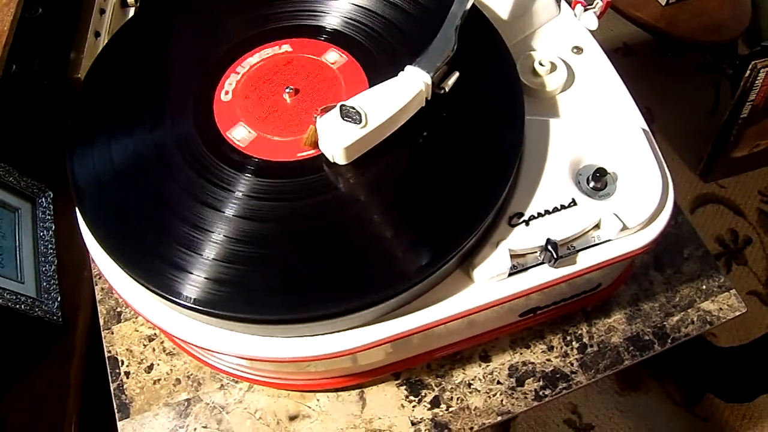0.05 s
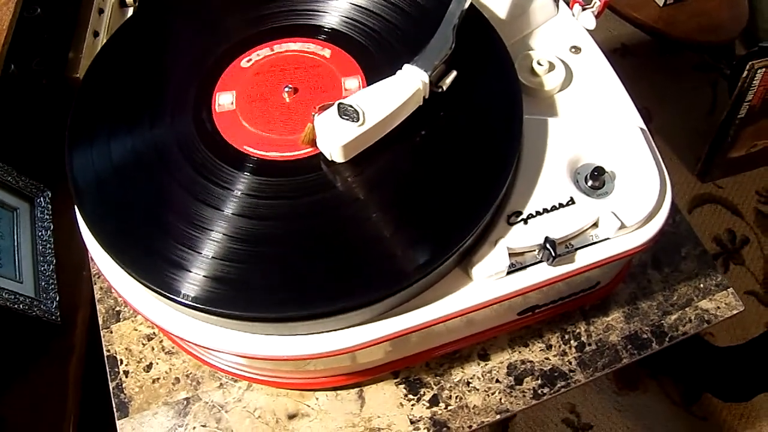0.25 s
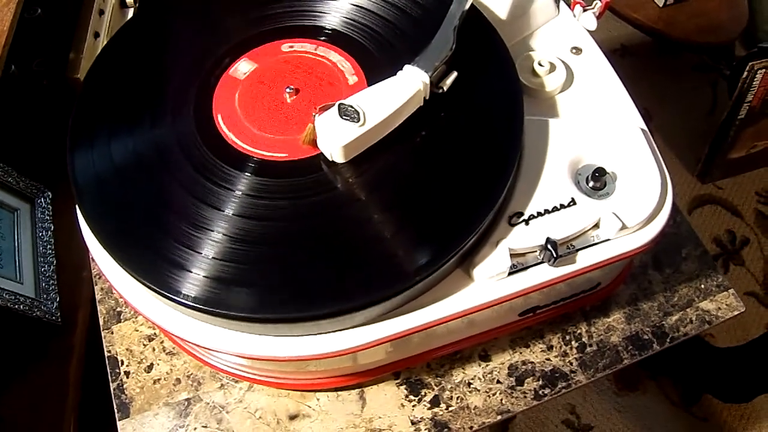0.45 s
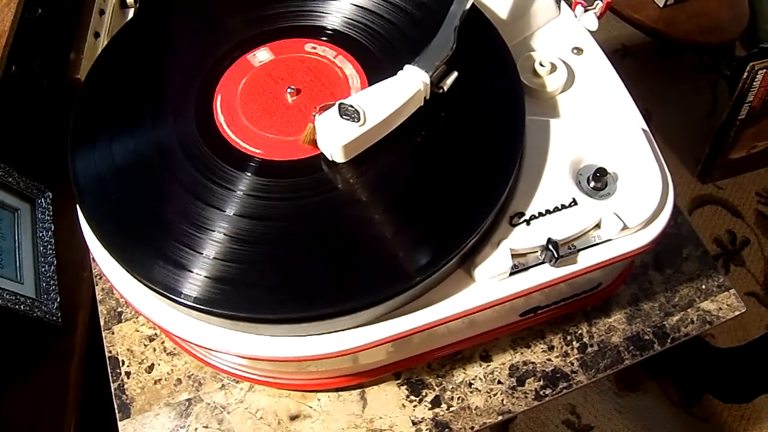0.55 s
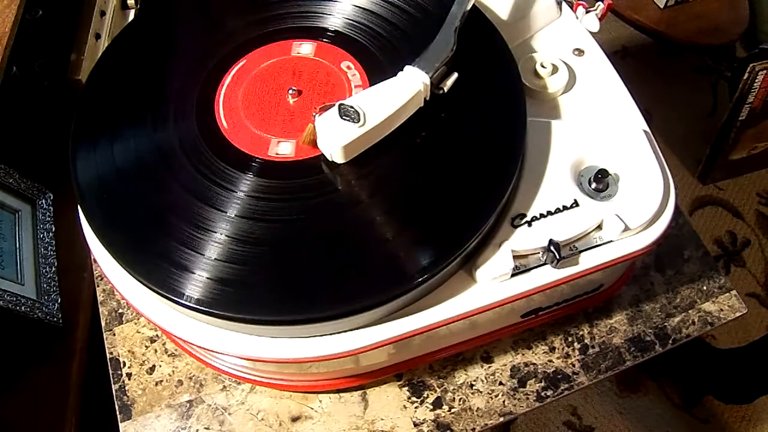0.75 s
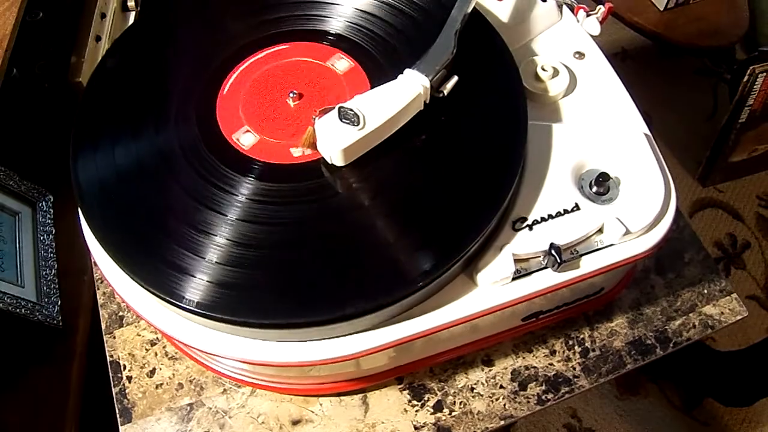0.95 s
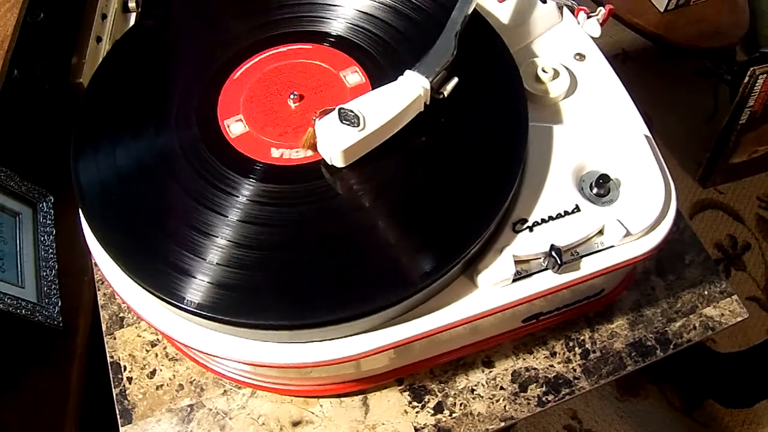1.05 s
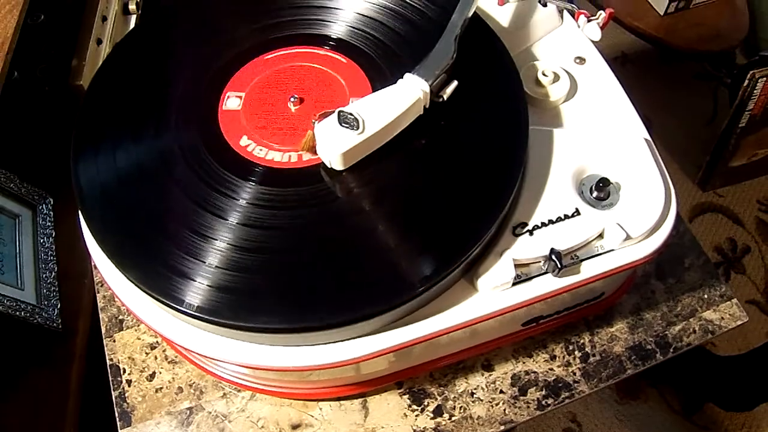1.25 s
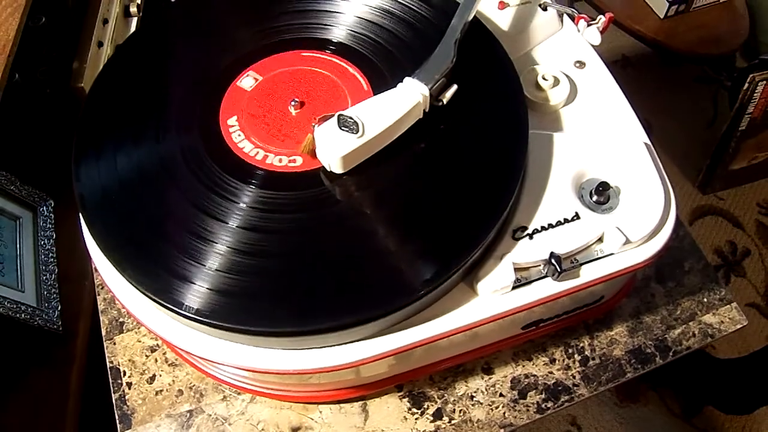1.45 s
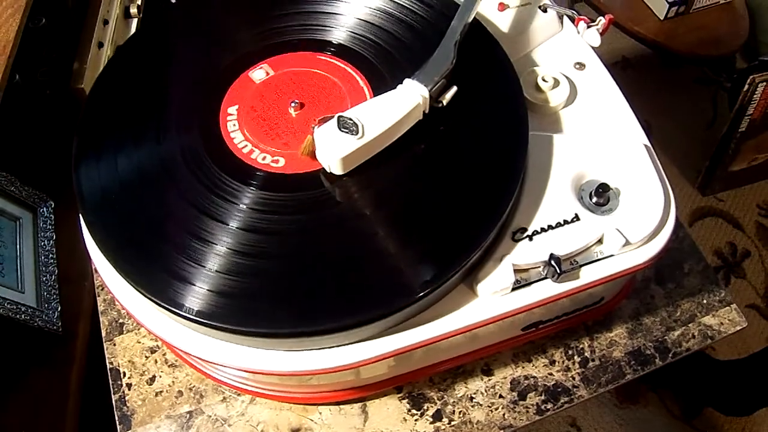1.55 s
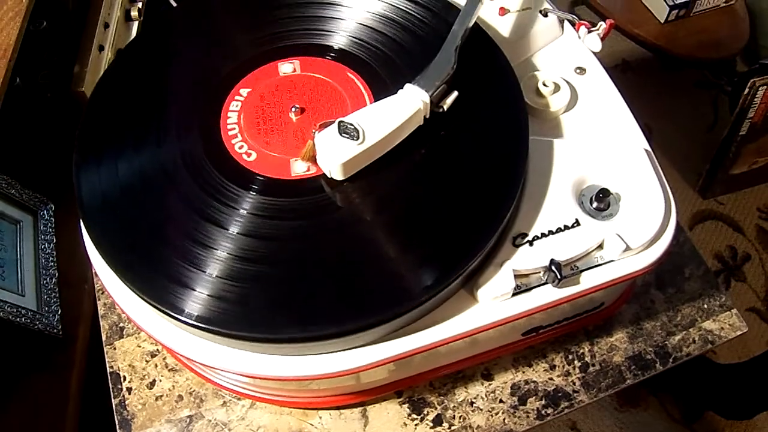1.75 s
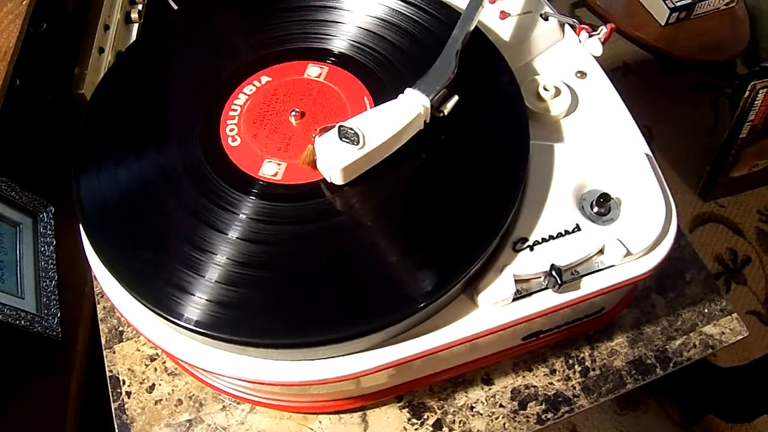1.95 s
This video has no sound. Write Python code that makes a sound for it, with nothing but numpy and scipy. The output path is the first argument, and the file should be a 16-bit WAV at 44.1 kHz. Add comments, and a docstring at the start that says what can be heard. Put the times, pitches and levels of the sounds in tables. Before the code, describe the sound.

A record player pops and clacks at a record's end over hiss and motor rumble.

```python
"""A soft rumble and hiss come first: a record player at the end of a side, close by in a small room.
Then the record changer's levers clack in two main bursts, shake the cabinet and leave a spring ringing.
The needle pops in the record's last groove, and the pops sound through the loudspeaker.
Underneath, the motor hums, dust ticks and a spinning part rubs once a turn."""
import sys
import numpy as np
from scipy import signal
from scipy.fft import rfft, irfft
from scipy.io import wavfile
from scipy.ndimage import uniform_filter1d

SR = 44100
rng = np.random.default_rng(int(sys.argv[2]) if len(sys.argv) > 2 else 0)


def log_audio(samples):
    """Write samples as a 16-bit WAV file to the path given in sys.argv[1]."""
    # one column per channel
    frames = np.atleast_2d(samples).T
    # limit to full scale, then quantise
    limited = np.clip(frames, -1, 1)
    pcm = np.round(limited * 32767).astype(np.int16)
    wavfile.write(sys.argv[1], SR, pcm)


N = 88200

# Lever hits (time [s], clack [dB], snap [dB], tick [dB], latch ring [dB], arm ring [dB], thud [dB])
LEVER_HITS = [(.4284, -54, -36.5, -30, -62, -52, -70), (0.4993, -40, -50, -49, -55, -39, -67),
              (.586, -42, -52, -52, -55, -44, -69), (0.604, -64, -31, -34, -63, -65, -34.5),
              (0.6074, -29, -23, -24, -67, -37.5, -74), (0.6147, -26.5, -13.5, -22.5, -34, -47, -58),
              (0.6171, -29, -44, -51, -31, -36, -25.5), (0.655, -64, -44, -50, -60, -68, -73),
              (0.7153, -33.5, -50, -58, -36, -42.5, -56.5), (0.7242, -32, -20.5, -49, -53, -70, -47),
              (0.727, -24, -18, -45, -71, -27.5, -43), (0.7397, -32.5, -28, -48, -60, -59, -30.5)]
# The tone of the dull clack and of the bright snap (frequency [Hz], level [dB])
CLACK_TONE = [(150, -40), (400, 8), (600, -7), (1000, 12.5), (1800, -3), (2700, 7), (3800, 2.5), (6000, 5),
              (14000, -7)]
SNAP_TONE = [(500, -12.5), (2000, 4), (4500, -11.5), (5500, -4), (6600, 1), (8500, 3.5), (10000, -3),
             (12300, -2), (14000, -14)]
# The notes each part rings with when struck (pitch [Hz], level [dB], time to fade by 60 dB [s])
LATCH_NOTES = [(1095, 0, .11), (1400, 0, .06), (1925, -3, .06), (2417, -9, .09), (2852, -8, .12),
               (6650, -7, .07), (6950, -8, .07), (12350, -5, .025)]
ARM_NOTES = [(920, -2.5, 0.033), (955, -0.5, 0.066), (1020, -5, 0.063), (1500, -17, 0.15), (2426, -7, 0.07),
             (2640, -2.5, 0.04), (2860, -11, 0.14), (5630, -15, 0.093), (12500, -2.5, 0.035)]
CABINET_NOTES = [(149, -2, 0.24), (173.8, -4.5, 0.49), (350.2, -8, 0.4), (447, -18.5, 0.23)]
PING_NOTES = [(5960, 0, .07), (4950, -12, .04)]
# Light touches that make a thin part ping (time [s], level [dB])
TOUCHES = [(0.5003, -37), (.587, -53)]


def levers(groan_hz=138, groan_db=-33):
    """Levers strike and make the latch, arm and cabinet ring; the cabinet groans under their load."""
    t = clock()
    clack_fade = fade(0.03) + amp(-11) * fade(0.22)  # a quick drop, then a quieter tail
    snap_fade = fade(0.012) + amp(-17) * fade(0.12)
    parts = [ring(notes) for notes in (LATCH_NOTES, ARM_NOTES, CABINET_NOTES)]
    out = sum(at(start, amp(db) * ring(PING_NOTES)) for start, db in TOUCHES)
    for start, clack_db, snap_db, tick_db, *parts_db in LEVER_HITS:
        clack = amp(clack_db) * clack_fade * noise(CLACK_TONE)
        snap_and_tick = (amp(snap_db) * snap_fade + amp(tick_db) * fade(0.006)) * noise(SNAP_TONE)
        ringing = sum(amp(db) * part for db, part in zip(parts_db, parts))
        out += at(start, clack + snap_and_tick + ringing)
    swell = amp(groan_db) * np.exp(-((t - 0.537) / 0.059) ** 2)  # loudest at 0.537 s
    groan = swell * np.sin(2 * np.pi * groan_hz * t + drift(40.3))
    return out + groan


# Needle pops (time [s], loudspeaker click [dB], bass boom [dB], crack [dB], bright edge [dB])
NEEDLE_POPS = [(0.384, -43, -66, -29.5, -36), (1.0315, -53, -67, -31.5, -73), (1.041, -30, -38, -35, -35),
               (1.051, -20, -35.5, -24.5, -33), (1.149, -39, -65, -36.5, -60), (1.2497, -13, -37, -58, -31),
               (1.357, -36, -57, -34, -58), (1.467, -13, -24.5, -17, -21.5), (1.682, -37.5, -52, -39, -65),
               (1.690, -30.5, -50, -25.5, -40), (1.708, -38, -33, -57, -60), (1.7418, -26.5, -54, -31, -39)]
# The tone of the loudspeaker, of a pop's crack and of its bright edge (frequency [Hz], level [dB])
SPEAKER_TONE = [(80, -15.5), (200, -14), (450, -7.5), (560, -18), (720, -4.5), (1050, -2.5), (1400, -5),
                (1850, 0), (2300, -8.5), (2700, -11), (3100, -22.5), (6000, -38), (14000, -45.5)]
CRACK_TONE = [(300, -40.5), (1300, -8.5), (1800, 7), (2300, 0), (2800, 3), (3200, -4.5), (3600, -19.5),
              (8000, -30.5)]
EDGE_TONE = [(500, -22), (2000, -3.5), (3000, 8), (3800, 1.5), (5500, 0), (8000, -7), (14000, -32)]
# The notes of the loudspeaker's cone and of its box (pitch [Hz], level [dB], fade time [s])
CONE_NOTES = [(430, -50, 0.036), (711, -24, 0.1), (874, -23, .06), (1730, -22.5, 0.024)]
BOX_NOTES = [(127, -21, 0.26), (150.2, 1, .13), (256, -13.5, 0.23), (418, -17, 0.14), (668, -19.5, 0.26)]


def needle_pops():
    """Each kick of the needle rings the loudspeaker, booms in its box and echoes round the room."""
    cone = click(SPEAKER_TONE) + ring(CONE_NOTES)
    crack, edge, box = click(CRACK_TONE), click(EDGE_TONE), ring(BOX_NOTES)
    direct, boom = np.zeros(N), np.zeros(N)
    for start, cone_db, boom_db, crack_db, edge_db in NEEDLE_POPS:
        direct += at(start, amp(cone_db) * cone + amp(crack_db) * crack + amp(edge_db) * edge)
        boom += at(start, amp(boom_db) * box)
    room = amp(-5) * echoes(direct, fade_s=0.055) + amp(-5.5) * echoes(direct, fade_s=0.24)
    return direct - boom + room


# The spring's high notes (pitch [Hz], level [dB], fade time [s])
SPRING_NOTES = [(5722, -64, 3), (6358, -61, 2.5), (7031, -65, 2.8), (7763, -61, 3), (8545, -65, 7),
                (12045, -74, 5), (13028, -66, 3)]


def spring(start_s=0.7242):
    """A spring is let go and rings on faintly; each note pulses at its own slow pace."""
    out = np.zeros(N)
    for note in SPRING_NOTES:
        pulse_hz = rng.uniform(1.017, 3.444)
        pulse = 1 + np.sin(2 * np.pi * (pulse_hz * clock() + rng.random()))
        out += ring([note]) * pulse
    return at(start_s, out)


# Rough spots in one turn (delay [s], half length [s], pitch [Hz], pitch spread [Hz], first level [dB])
ROUGH_SPOTS = [(.0012, 0.003, 6440, 420, -59.5), (.0066, 0.0026, 11050, 1070, -62),
               (.008, 0.0049, 6500, 2500, -68)]


def spinning_rub(turns_per_s=39.65, fade_db_per_s=-3, fresh_share=0.25):
    """A spinning part brushes the same rough spots on every turn, slowly getting quieter."""
    t, turns, out = clock(), np.zeros(N), np.zeros(N)
    turn_starts_s = np.arange(0, N / SR, 1 / turns_per_s)
    turns[(turn_starts_s * SR).astype(int)] = 1
    for delay, half_length, hz, spread_hz, db in ROUGH_SPOTS:
        spot = np.exp(-((t - delay) / half_length) ** 2)
        repeated = through(turns, spot * rng.standard_normal(N))  # the same on every turn
        fresh = through(turns, spot) * rng.standard_normal(N)  # new on every turn
        band = signal.iirpeak(hz, hz / spread_hz, fs=SR)
        out += amp(db) * unit(signal.lfilter(*band, repeated + fresh_share * fresh))
    return out * amp(fade_db_per_s * t)


# The tone of the motor's rumble and of the groove's hiss (frequency [Hz], level [dB])
RUMBLE_TONE = [(20, -23), (32, -24), (42, 1), (60, 1.5), (80, -1), (105, -2), (138, 1), (170, -4),
               (205, -11.5), (255, -10.5), (320, -19.5), (600, -25), (1500, -42)]
HISS_TONE = [(100, -12), (500, 2), (1200, 0.5), (2000, 1), (2400, -1), (3200, 0), (3800, -2), (6800, -3.5),
             (9000, -5.5), (13500, -10)]
# How loud the two are as time passes (time [s], rumble [dB], hiss [dB])
BACKGROUND_LEVELS = [(0, -40.5, -51), (.55, -39.5, -51), (.85, -43, -54.5), (1.201, -46, -52.5),
                     (1.6, -45, -55.5), (2, -48.5, -53)]
# The motor's low hums and high whines (pitch [Hz], level [dB])
MOTOR_NOTES = [(39.65, -54), (59.2, -53.5), (118.6, -51), (3327, -71.5), (4078, -69), (6222, -62)]


def motor_and_groove():
    """The motor rumbles and hums while the groove hisses into the room; all of it wavers a little."""
    t = clock()
    times, rumble_db, hiss_db = np.array(BACKGROUND_LEVELS).T
    rumble = noise(RUMBLE_TONE) * amp(np.interp(t, times, rumble_db) + 1.03 * drift(15.7))
    hiss = noise(HISS_TONE)
    hiss = unit(hiss + echoes(hiss, fade_s=0.08))
    hiss *= amp(np.interp(t, times, hiss_db) - 1.1 * drift(21.6))
    hum = np.zeros(N)
    for hz, db in MOTOR_NOTES:
        loudness = amp(db + 0.5 * drift(4.94))
        hum += loudness * np.sin(2 * np.pi * hz * t + 0.32 * drift(7.3))
    return rumble + hiss + hum


def dust(count=24, level_db=-47, spread_db=4):
    """Specks in the groove tick faintly through the loudspeaker."""
    kicks = np.zeros(N)
    kicks[rng.integers(0, N, count)] = amp(level_db + spread_db * rng.standard_normal(count))
    return through(kicks, click(SPEAKER_TONE))


def echoes(x, fade_s):
    """A blur of room echoes that dies away, about as strong as the sound itself."""
    tail = rng.standard_normal(N) * fade(fade_s)
    return through(x, at(0.002, tail / np.linalg.norm(tail)))


def amp(db):
    """Turn decibels into a number to multiply a sound by."""
    return 10 ** (np.asarray(db) / 20)


def clock():
    """The time of every sample, in seconds."""
    return np.arange(N) / SR


def unit(x):
    """Scale a signal so that its typical swing is 1."""
    return x / np.std(x)


def gains(tone):
    """Join a tone table's points to get the strength of every frequency."""
    hz, db = np.array(tone).T
    every_hz = np.arange(N // 2 + 1) * SR / N
    return amp(np.interp(np.log(every_hz + 1), np.log(hz), db))


def noise(tone):
    """Steady noise with the given tone."""
    return unit(irfft(rfft(rng.standard_normal(N)) * gains(tone), N))


def click(tone):
    """One click shaped by the given tone, with a peak of 1."""
    cepstrum = irfft(np.log(gains(tone)), N)
    first_half = np.arange(N) < N // 2  # keeping only this half packs the energy at the start
    pulse = irfft(np.exp(rfft(2 * cepstrum * first_half)), N)
    return pulse / np.abs(pulse).max()


def fade(fade_s):
    """A smooth fall of 60 dB every fade_s seconds."""
    return amp(-60 * clock() / fade_s)


def ring(notes):
    """A struck object rings with pure notes that die away."""
    return sum(amp(db) * fade(fade_s) * np.sin(2 * np.pi * hz * clock()) for hz, db, fade_s in notes)


def through(x, response):
    """Let every sample of x set off its own copy of the response."""
    return signal.fftconvolve(x, response)[:N]


def at(start, x):
    """Delay a sound to its start time, in seconds."""
    return np.concatenate([np.zeros(int(start * SR)), x])[:N]


def drift(steps_per_s):
    """A smooth random wobble with a typical swing of 1."""
    hold = int(SR / steps_per_s)
    steps = np.repeat(rng.standard_normal(N // hold + 1), hold)
    return unit(uniform_filter1d(uniform_filter1d(steps, hold), hold)[:N])


def scene():
    """All the sounds meet at one microphone."""
    return (levers() + spring() + needle_pops() + spinning_rub() + motor_and_groove() + dust())[None]


def record(dry, low_cut_hz=32, high_cut_hz=14000):
    """Cut away the deepest bass and the highest treble."""
    thin = signal.sosfilt(signal.butter(3, low_cut_hz, "high", fs=SR, output="sos"), dry)
    return signal.sosfilt(signal.ellip(10, .2, 80, high_cut_hz, fs=SR, output="sos"), thin)


dry = scene()
out = record(dry)
log_audio(out)
```